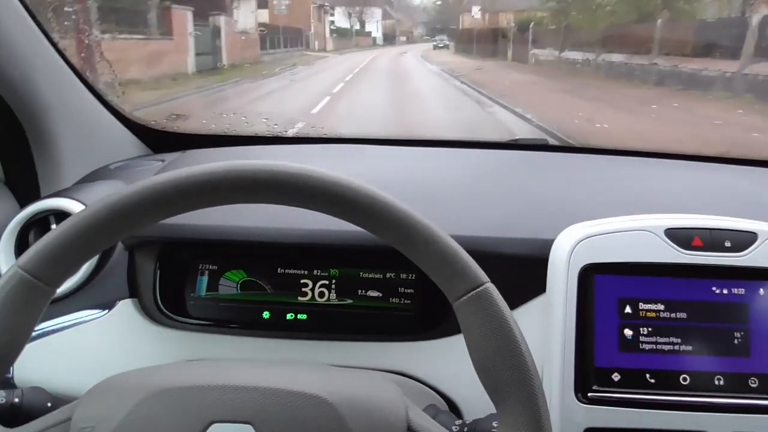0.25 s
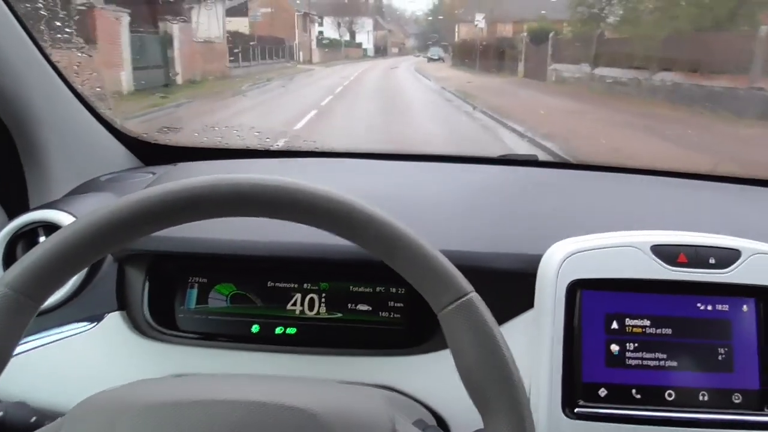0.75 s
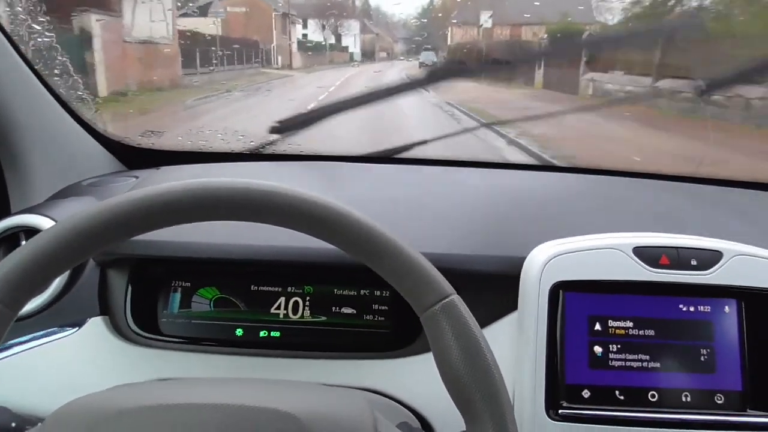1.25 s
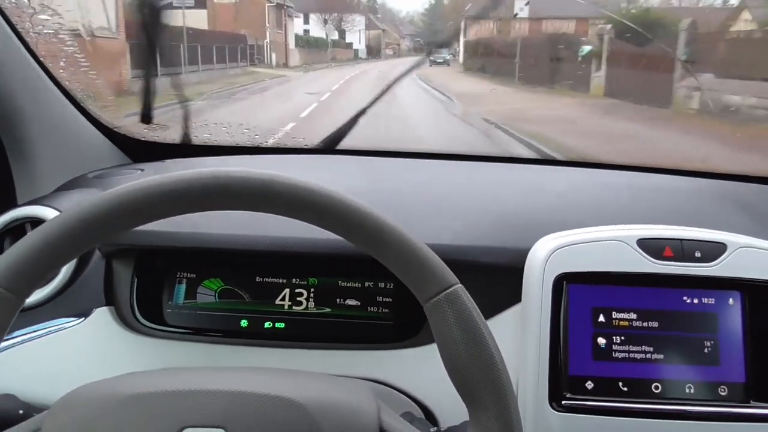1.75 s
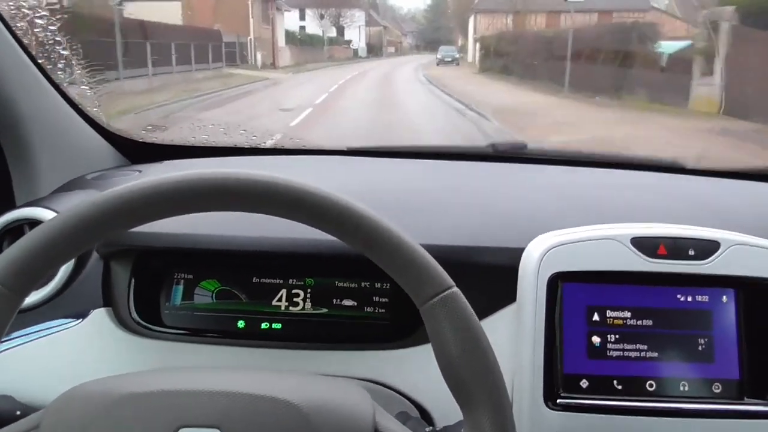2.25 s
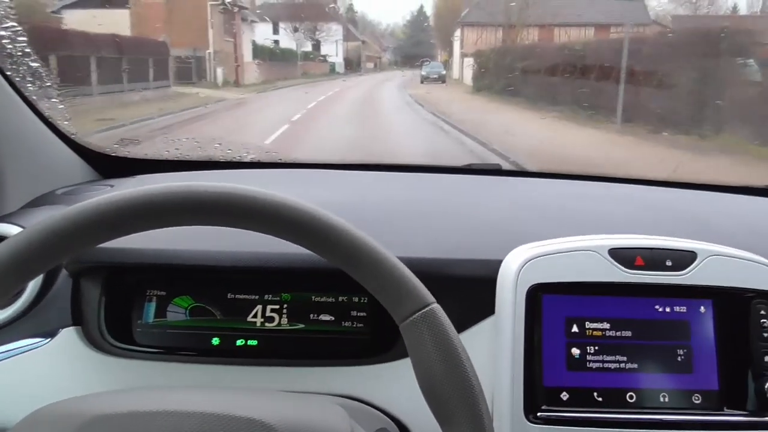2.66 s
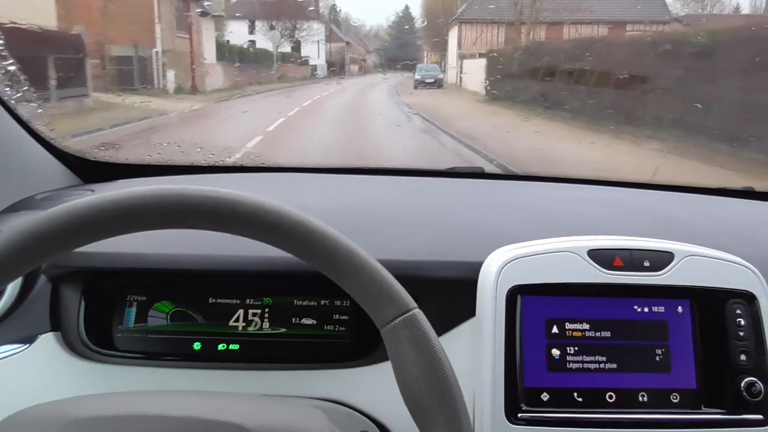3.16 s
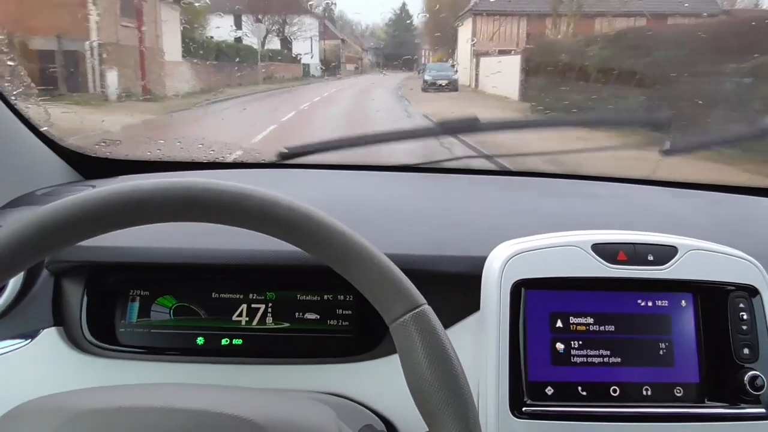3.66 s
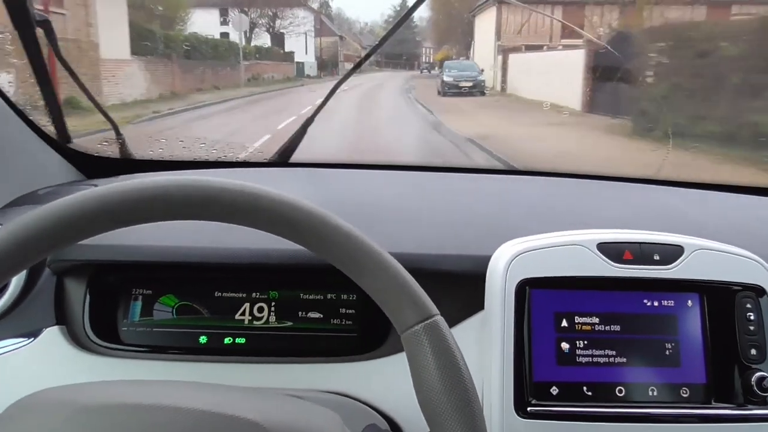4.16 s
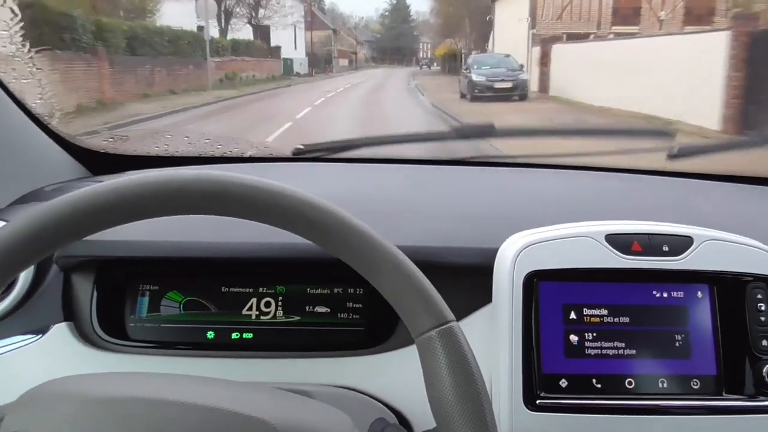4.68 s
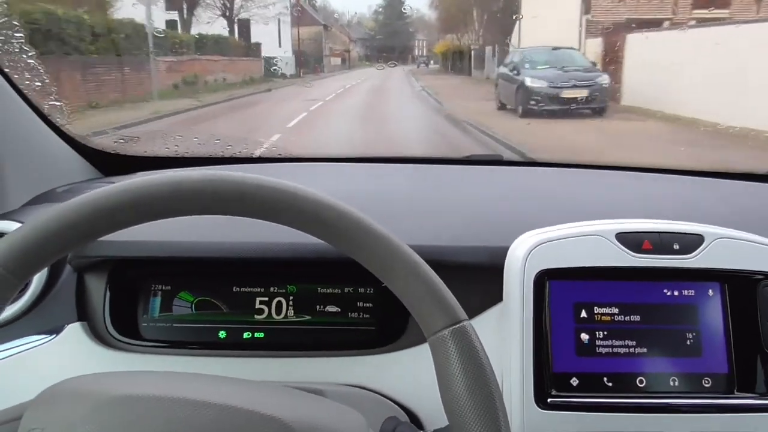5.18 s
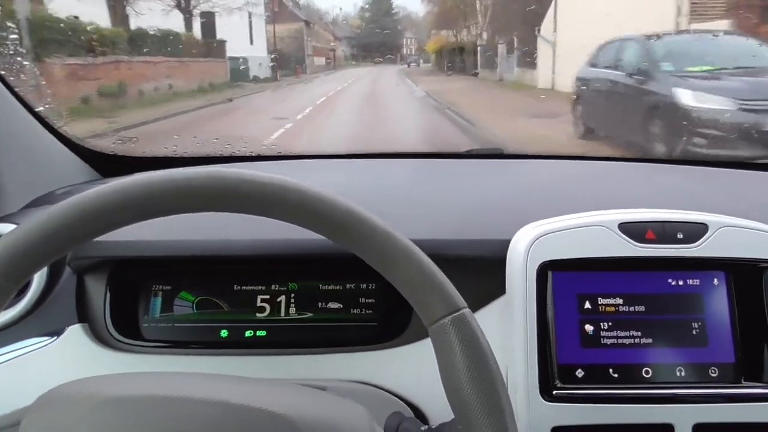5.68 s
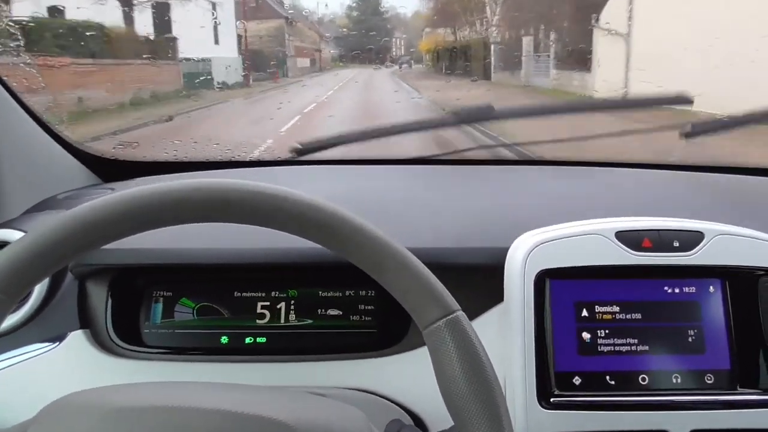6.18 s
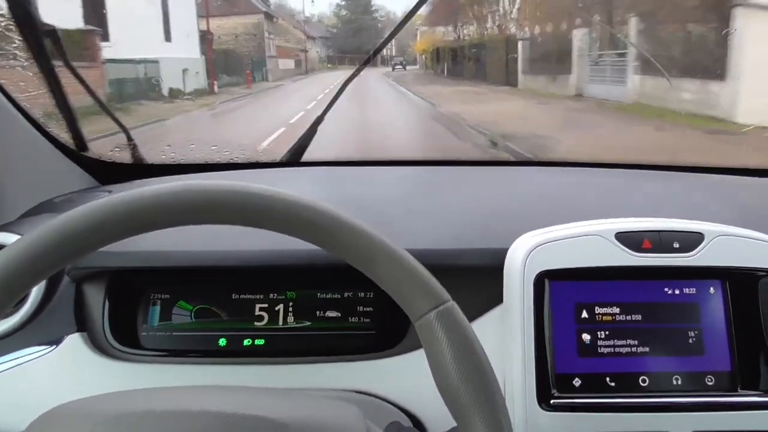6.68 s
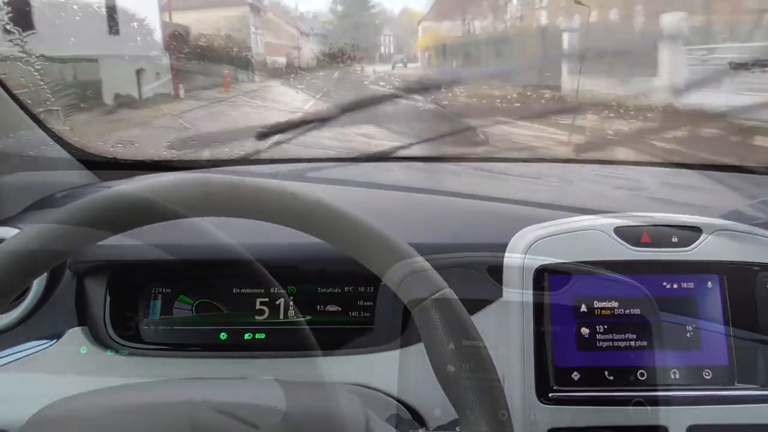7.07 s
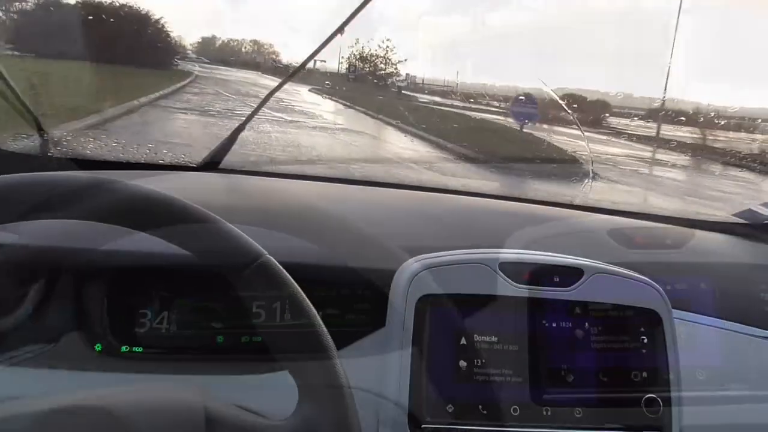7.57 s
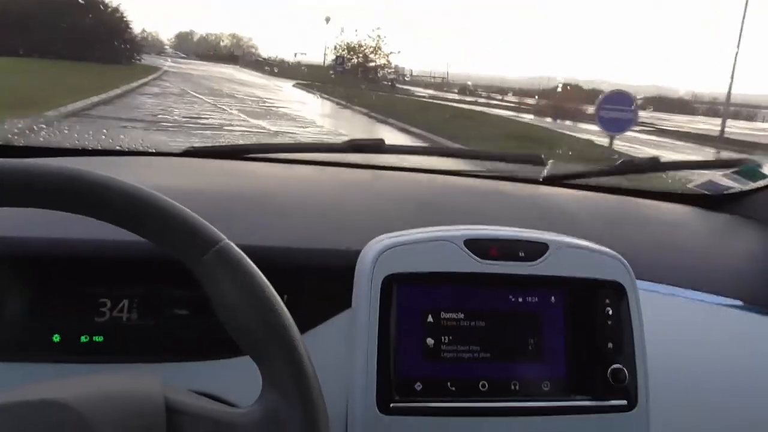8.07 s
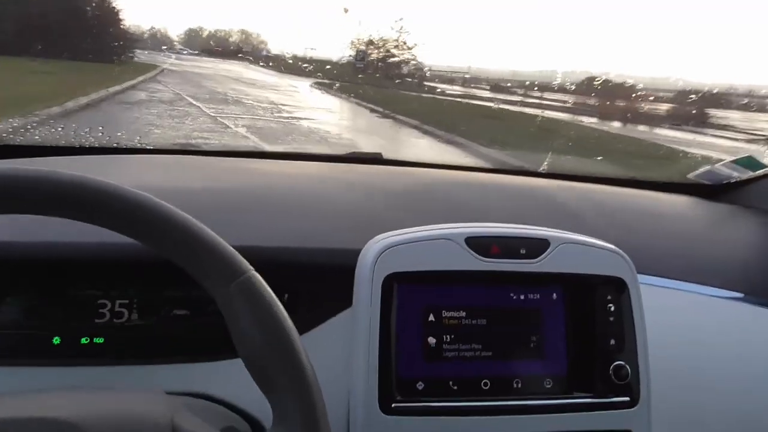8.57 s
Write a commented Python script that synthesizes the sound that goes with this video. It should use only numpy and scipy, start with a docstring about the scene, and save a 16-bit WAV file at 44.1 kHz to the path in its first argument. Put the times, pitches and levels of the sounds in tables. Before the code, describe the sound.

Rain patters in flurries on the windscreen and roof of a moving car, over a steady low tyre drone, all heard inside the cabin. The wipers set off three times with a dull thump, knocking on the return and chirping softly on the glass. Rain and road noise build gradually; then a rougher stretch brings a deeper rumble, a few booming bumps and more wiper knocks.

```python
"""Electric car in heavy rain

Heard from inside: gathering speed on a smooth wet street, then slower on a coarse road.
The tyres rumble through the body and make the cabin boom; flurries of drops patter on windscreen
and roof. The wipers thump as they set off and turn back, and their rubber squeaks on the glass."""
import sys
import numpy as np
from scipy import signal
from scipy.fft import rfft, irfft, next_fast_len
from scipy.io import wavfile
from scipy.ndimage import uniform_filter1d

SR = 44100
rng = np.random.default_rng(int(sys.argv[2]) if len(sys.argv) > 2 else 0)


def master(y):
    """Save y as 16-bit WAV."""
    cut = np.clip(np.atleast_2d(y).T, -1, 1)
    pcm = np.round(cut * 32767)  # scale
    wavfile.write(sys.argv[1], SR, pcm.astype(np.int16))


N = 389403
TIME_S = np.arange(N) / SR

# drops on glass, spectrum: f/Hz, relative level/dB
GLASS_SPECTRUM = [(900, -22), (1700, -10), (2200, -2), (2900, -2), (4100, 2), (4900, -2.5), (6000, -9),
                  (6700, -7), (7700, -3.5), (9200, -10), (11000, -12), (13000, -15.5), (15700, -31)]
# likeness of the two ears: f/Hz, coherence
ROAD_COHERENCE = [(30, .994), (140, .987), (280, .94), (500, .78), (1000, .62), (2000, .65)]
RAIN_COHERENCE = [(2000, 0.73), (4200, 0.73), (6000, 0.66), (7800, 0.4), (9500, -0.43), (12000, 0.32),
                  (15000, .2)]
# lean between the ears: f/Hz, left minus right/dB
ROAD_BALANCE = [(140, 1.5), (280, -0.6), (1000, -2.5), (2000, -.5)]
RAIN_BALANCE = [(2000, 0.7), (8000, -0.6), (10000, 0), (13000, -3.5)]
# wipers setting off: t/s, strength/dB, hardness/Hz
WIPER_STARTS = [(1.095, -4.5, 700), (3.634, 0.5, 850), (6.141, 3, 950)]


def road(shudder_waver_db=2.0, boom_waver_db=2.06):
    """Asphalt shakes the body and drives the cabin's air resonance; both swell and dip briefly."""
    # body vibration: f/Hz, relative level/dB
    shudder_spectrum = [(12, 7), (24, -53), (38, -8), (51, 2), (63, 7), (80, 4), (100, 10.5), (135, 12.5)]
    shudder_db = driven_db(-35, doubling_db=5.9, coarse_db=17.3) + jolt_db(0)
    shudder_db += shudder_waver_db * drift(17)
    boom_db = driven_db(-26.5, doubling_db=13.5, coarse_db=11) + jolt_db(1)
    boom_db += boom_waver_db * drift(7.3)
    shudder = coloured(noise_pair(), shudder_spectrum, ROAD_COHERENCE, ROAD_BALANCE)
    shudder = evened(shudder, window_s=0.082)
    boom = ring(rng.standard_normal(N), hz=132.2, t60_s=0.18)
    boom = ring(boom, hz=172.3, t60_s=0.065)
    boom = evened(high_pass(boom, hz=134), window_s=0.092)
    return from_db(shudder_db) * shudder + from_db(boom_db) * boom


def tyres(drone_waver_db=1.4, roar_waver_db=1.66, spray_db=-74.5):
    """The tread drones through the panels, roars on the water film and throws up hissing spray."""
    # spectra: f/Hz, relative level/dB
    drone_spectrum = [(150, -7.5), (195, -1.5), (235, -1.5), (262, 1.5), (310, 1.5), (380, -2), (412, -7),
                      (438, -5), (475, -9), (530, -10.5), (620, -25.5)]
    roar_spectrum = [(400, -4), (560, 0), (665, 4), (740, 1.5), (810, 4), (880, 0.5), (970, 3.5),
                     (1040, -0.5), (1200, -2), (1450, -8.5), (1750, -19.5), (3000, -27)]
    spray_spectrum = [(5000, -14), (8000, -20), (11000, 1), (13500, 0), (15600, 4)]
    drone_db = driven_db(-30, doubling_db=8.6, coarse_db=5.7) + drone_waver_db * drift(8)
    drone = coloured(noise_pair(), drone_spectrum, ROAD_COHERENCE, ROAD_BALANCE)
    roar_db = driven_db(-43.5, doubling_db=8.1, coarse_db=4.76) + jolt_db(2)
    roar_db += roar_waver_db * drift(8.1)
    roar = coloured(noise_pair(), roar_spectrum, ROAD_COHERENCE, ROAD_BALANCE)
    spray = coloured(noise_pair(), spray_spectrum, RAIN_COHERENCE, RAIN_BALANCE)
    return from_db(drone_db) * drone + from_db(roar_db) * roar + from_db(spray_db) * spray


def rain(flutter_db=1.5, mist_power=0.4, split_hz=6000, ticks_db=-2.0):
    """Drops hit the glass as noise bursts over a steady mist; the finest tick highest."""
    flutter = from_db(flutter_db * np.clip(drift(32), -2, 2))
    large_power = spatter(per_s=310, size_db=2.5, t60_s=0.019) + mist_power
    medium_power = spatter(per_s=1100, size_db=-1.5, t60_s=0.0096)
    fine_power = spatter(per_s=1900, size_db=-3.0, t60_s=0.0012)
    low_pass = signal.butter(2, split_hz, fs=SR, output="sos")
    medium = signal.sosfilt(low_pass, np.sqrt(medium_power) * noise_pair())
    fine = high_pass(np.sqrt(fine_power) * noise_pair(), split_hz)
    large = np.sqrt(large_power) * noise_pair()
    hits = flutter * (large + from_db(ticks_db) * (medium + fine))
    patter = coloured(hits, GLASS_SPECTRUM, RAIN_COHERENCE, RAIN_BALANCE)
    return rainfall() * evened(patter, window_s=0.15)


def spatter(per_s, size_db, t60_s):
    """Power of randomly landing drops of uneven size, each dying away; mean 1."""
    lands = rng.random(N) < per_s / SR
    drop_db = size_db * np.minimum(rng.exponential(1, N), 3.5)
    decay = from_db(-60 / (t60_s * SR)) ** 2
    power = signal.lfilter([1], [1, -decay], lands * from_db(drop_db) ** 2 + 1e-18)
    return power / power.mean()


def rainfall(attack_s=0.02, release_s=0.05):
    """Patter gain: the car drives into steady rain, with flurries on top."""
    # flurries on the glass: start/s, length/s, level/dB
    flurries = [(0.307, 0.11, -59), (0.772, 0.13, -54.5), (1.198, 0.35, -54.5), (1.574, 0.31, -52.5),
                (1.95, 0.2, -51), (2.428, .28, -52), (2.79, 0.38, -53.5), (3.258, 0.22, -54),
                (3.49, 0.76, -50), (4.277, 0.32, -50), (4.804, 0.23, -50.5), (5.118, 0.093, -51),
                (5.325, 0.052, -51), (5.659, 0.25, -49), (5.982, 0.17, -48), (6.326, 0.5, -51.5),
                (7.2, .34, -49), (7.714, 0.4, -51), (8.445, 0.44, -49.7)]
    power = from_db(driven_db(-53.5, doubling_db=9.6, coarse_db=9.8)) ** 2
    for start_s, length_s, db in flurries:
        attack = np.clip((TIME_S - start_s) / attack_s + 0.5, 0, 1)
        release = np.exp(-np.clip((TIME_S - start_s - length_s) / release_s, 0, 20))
        power += (from_db(db) * attack * release) ** 2
    return np.sqrt(power)


def splashes(decay_s=0.0091, gain_db=-12):
    """A big drop bursts on the glass into a brief spray of droplets."""
    # big drops: t/s, relative level/dB
    big_drops = [(1.6382, -32), (1.8095, -27.5), (2.4942, -32.5), (3.9514, -34), (4.326, -27), (4.949, -31),
                 (5.0067, -29), (6.0576, -29), (6.136, -30), (6.5956, -31), (7.3647, -33), (7.42, -29)]
    envelope = np.zeros(N)
    for at_s, db in big_drops:
        start = int(at_s * SR)
        decay = np.exp(-np.minimum(TIME_S[:N - start] / decay_s, 20))
        envelope[start:] += from_db(db + gain_db) * decay
    return envelope * coloured(noise_pair(), GLASS_SPECTRUM, RAIN_COHERENCE, RAIN_BALANCE)


def wiper_thumps(spread_db=3.5):
    """Linkage blows ring the panel under the windscreen; soft blows leave the high modes quiet."""
    # panel modes: f/Hz, relative level/dB, t60/s
    panel_modes = [(190, -13.5, .15), (232, -19, .09), (305, -24, .08), (372, -19, .1), (445, -16.5, .14),
                   (560, -28, .06), (720, -33, .06), (825, -29.5, .07), (962, -28.5, .06),
                   (1180, -31.5, .06), (1420, -35, .05), (1852, -44, .03)]
    at_s, strength_db, hardness_hz = np.transpose(linkage_blows())
    scatter_db = spread_db * rng.standard_normal((len(at_s), len(panel_modes)))
    panel = np.zeros(N)
    for k, (hz, db, t60_s) in enumerate(panel_modes):
        force = from_db(strength_db + db + scatter_db[:, k])
        blows = np.zeros(N)
        blows[(at_s * SR).astype(int)] = force / (1 + (hz / hardness_hz) ** 4)
        panel += (-1) ** k * ring(blows, hz, t60_s)
    return cabin(high_pass(panel, hz=129), t60_s=0.059, wet_db=-10.5)


def linkage_blows(touch_lead_s=0.00604, touch_hardness=0.47, rebound_s=0.0172, rebound_hardness=0.57):
    """Slack linkage clatters under load, arms knock; rows of t/s, strength/dB, hardness/Hz."""
    # clatter at each start: delay/s, relative strength/dB, hardness ratio
    clatter = [(-.024, 2, 0.4), (-.008, -7.5, 0.39), (0, 0.5, 0.58), (.0045, -12.5, 1), (.029, -7, .55)]
    # arms turning back or jolted: t/s, strength/dB, hardness/Hz, first touch/dB, rebound/dB
    knocks = [(1.81, 2, 1500, -8.5, -1.5), (4.3264, -0.5, 1410, -5, -12), (6.353, -8.5, 800, -12, -10),
              (6.823, -9.5, 1200, -6, -18), (7.665, -5.5, 1110, -8, 3.5), (8.678, -7, 1300, -10, -6),
              (8.704, -8, 1520, -16, -13), (8.748, -10, 1500, -13, -11)]
    blows = []
    for at_s, db, hz in WIPER_STARTS:
        blows += [(at_s + delay_s, db + blow_db, hz * ratio) for delay_s, blow_db, ratio in clatter]
    for at_s, db, hz, touch_db, rebound_db in knocks:
        touch = (at_s - touch_lead_s, db + touch_db, hz * touch_hardness)
        rebound = (at_s + rebound_s, db + rebound_db, hz * rebound_hardness)
        blows += [touch, (at_s, db, hz), rebound]
    return blows


def blade_snaps(lead_s=0.00483, gain_db=-22):
    """At each start the rubber blade snaps free of the glass and rings briefly."""
    snaps = np.zeros(N)
    for at_s, db, _ in WIPER_STARTS:
        snaps[int((at_s - lead_s) * SR)] = from_db(db + gain_db)
    return high_pass(ring(snaps, hz=806, t60_s=0.093), hz=500)


def wiper_squeaks():
    """The rubber lip sticks and slips in short chirps of unsteady pitch."""
    # chirps: peak t/s, f/Hz, level/dB, half length/s, relative pitch waver
    squeaks = [(1.666, 2090, -56, 0.035, .05), (4.2, 2100, -52, 0.034, 0.12), (6.1, 2070, -60, .03, 0.066),
               (7.536, 2100, -48, 0.0046, 0.036), (7.454, 4780, -37, 0.0058, .012),
               (7.466, 4660, -25.5, 0.0025, 0.0122)]
    wander_s = np.cumsum(drift(122)) / SR
    chirps = np.zeros(N)
    for at_s, hz, db, half_s, waver in squeaks:
        tone = np.sin(2 * np.pi * hz * (TIME_S + waver * wander_s))
        chirps += from_db(db) * swell(at_s, half_s) * tone
    return cabin(chirps, t60_s=0.05, wet_db=-9)


def cabin(x, t60_s, wet_db):
    """Dense reflections, different at each ear, that the seats soak up quickly."""
    t = TIME_S[:SR // 5]
    tail = rng.standard_normal((2, len(t))) * from_db(-60 * t / t60_s)
    tail *= from_db(wet_db) / np.sqrt(np.sum(tail ** 2, axis=1, keepdims=True))
    return x + signal.fftconvolve(np.atleast_2d(x), tail, axes=1)[:, :N]


def driven_db(cruise_db, doubling_db, coarse_db, cruise_kmh=50):
    """Level that rises with each doubling of speed and with road coarseness."""
    # the drive: t/s, speed/(km/h)
    speed_curve = [(0.0, 37.2), (0.5, 34), (1.3, 44.7), (2.7, 47.7), (3.7, 51), (5.2, 47.3), (7.05, 52.8),
                   (7.5, 34.2), (8.83, 36.9)]
    # smooth street to coarse, waterlogged road: t/s, coarseness 0-1
    surface_curve = [(0.0, 0), (6.9, 0.06), (7.45, 0.61), (7.9, 0.9), (8.83, 0.75)]
    speed_kmh = np.interp(TIME_S, *np.transpose(speed_curve))
    coarseness = np.interp(TIME_S, *np.transpose(surface_curve))
    return cruise_db + doubling_db * np.log2(speed_kmh / cruise_kmh) + coarse_db * coarseness


def jolt_db(column):
    """Brief swells and dips from road bumps and wiper thumps; column 0 shudder, 1 boom, 2 roar."""
    # swells and dips: middle t/s, half length/s, shudder/dB, boom/dB, roar/dB
    jolts = [(0.67, 0.061, 5, 7, 0.5), (1.126, 0.048, 16.5, 4, -0.5), (1.278, 0.11, 2, 6.5, 0),
             (1.83, 0.026, 5, 6.5, 3), (2.284, .1, -7, 5.5, 1), (2.522, .06, 3, 2.5, 1),
             (3.184, 0.075, 2, 7, 0.5), (3.433, 0.036, -5, 5.5, -3), (3.634, 0.049, 9, 3, 6.5),
             (4.938, 0.053, 3, 6.5, 2), (6.95, 0.46, 0.5, 0, -0.5), (7.34, .06, 1.5, -5, -2),
             (7.977, .11, 3.5, 10, 5), (8.348, 0.086, 9, 10.5, 1), (8.723, 0.072, 2.5, 1, 8.5)]
    return sum(change_db[column] * swell(at_s, half_s) for at_s, half_s, *change_db in jolts)


def coloured(pair, spectrum, coherence, balance):
    """Two unrelated signals to stereo of given colour, width and lean; mid rms 1."""
    size = next_fast_len(N)
    hz = np.arange(size // 2 + 1) * SR / size
    roll_off = np.maximum(hz / spectrum[-1][0], 1) ** -3
    mid, side = rfft(pair, size) * from_db(at_hz(spectrum, hz)) * roll_off
    alike = np.clip(at_hz(coherence, hz), -0.9, 0.999)
    side *= np.sqrt((1 - alike) / (1 + alike))
    lean = from_db(at_hz(balance, hz) / 2)
    ears = irfft(np.array([(mid + side) * lean, (mid - side) / lean]), size)[:, :N]
    return ears / np.std(ears.mean(axis=0))


def evened(x, window_s):
    """Hold noise power steady over the window."""
    power = np.mean(np.atleast_2d(x) ** 2, axis=0)
    power = uniform_filter1d(power, int(window_s * SR))
    return x / np.sqrt(np.abs(power) + 1e-9)


def ring(clicks, hz, t60_s):
    """One mode: a unit click rings a decaying unit sine."""
    r = from_db(-60 / (t60_s * SR))
    w = 2 * np.pi * hz / SR
    return signal.lfilter([0, np.sin(w)], [1, -2 * r * np.cos(w), r * r], clicks + 1e-18)


def drift(rate_hz):
    """Slow random wander, rms 1."""
    hop, settle = 20, 4000
    r = np.exp(-2 * np.pi * rate_hz * hop / SR)
    noise = rng.standard_normal(N // hop + settle + 2)
    slow = signal.lfilter([1], [1, -2 * r, r * r], noise)[settle:]
    slow /= np.sqrt(np.mean(slow ** 2))
    return np.interp(np.arange(N) / hop, np.arange(len(slow)), slow)


def swell(at_s, half_s):
    """Gaussian envelope, peak 1."""
    return np.exp(-np.minimum(((TIME_S - at_s) / half_s) ** 2, 20))


def noise_pair():
    """Two unrelated white noises."""
    return rng.standard_normal((2, N))


def high_pass(x, hz):
    """Second-order bass cut."""
    return signal.sosfilt(signal.butter(2, hz, "high", fs=SR, output="sos"), x)


def at_hz(points, hz):
    """Read a table on a log-frequency axis."""
    known_hz, values = np.transpose(points)
    return np.interp(np.log(hz + 1), np.log(known_hz), values)


def from_db(db):
    """Decibels to gain."""
    return 10 ** (np.asarray(db) / 20)


def scene():
    """Everything as heard from the driver's seat."""
    return road() + tyres() + rain() + splashes() + wiper_thumps() + blade_snaps() + wiper_squeaks()


def record(dry):
    """Round the highest peaks and cut the top steeply."""
    ceiling, cutoff_hz = 0.62, 15600
    rounded = dry / (1 + (dry / ceiling) ** 6) ** (1 / 6)
    return signal.sosfilt(signal.ellip(12, 0.1, 90, cutoff_hz, fs=SR, output="sos"), rounded)


dry = scene()
out = record(dry)
master(out)
```